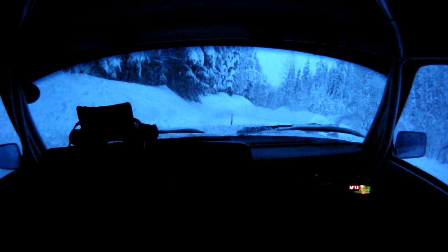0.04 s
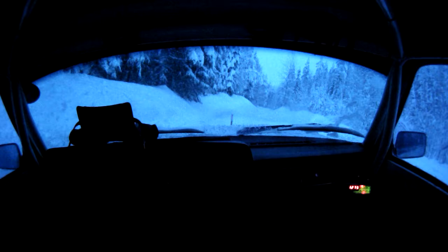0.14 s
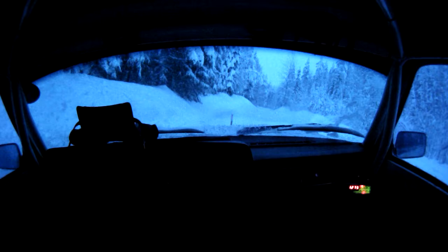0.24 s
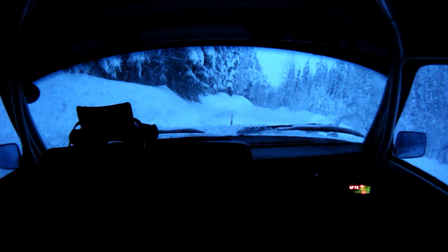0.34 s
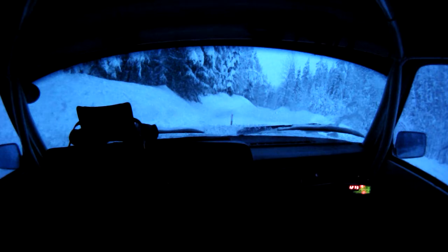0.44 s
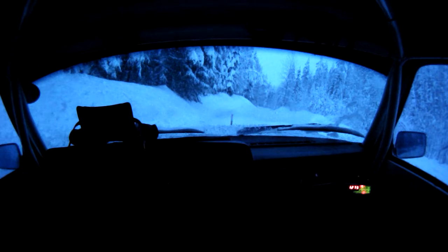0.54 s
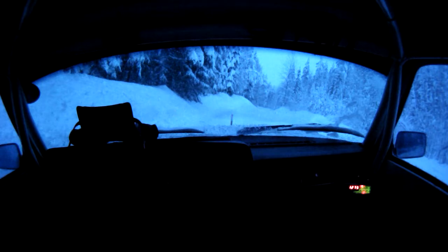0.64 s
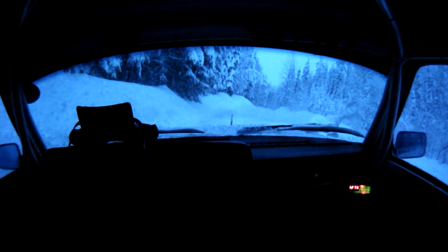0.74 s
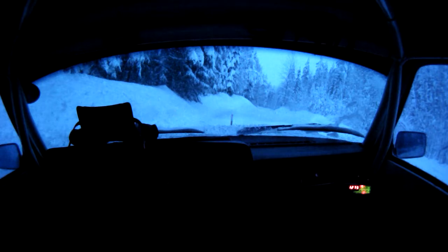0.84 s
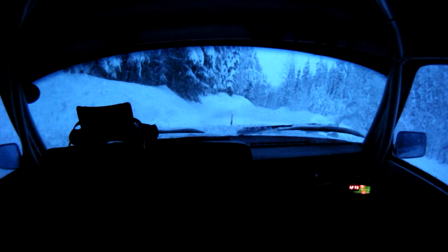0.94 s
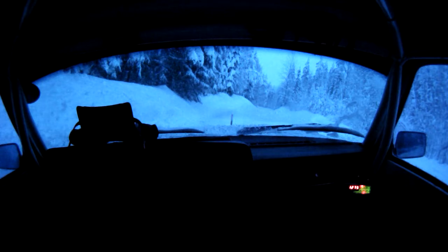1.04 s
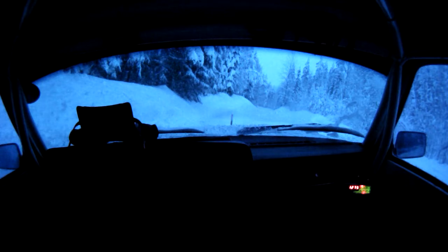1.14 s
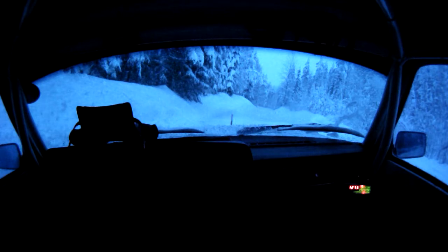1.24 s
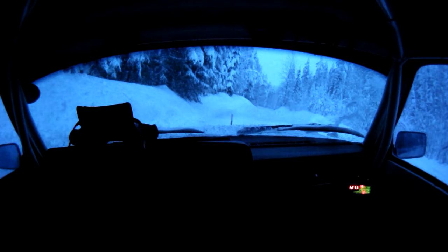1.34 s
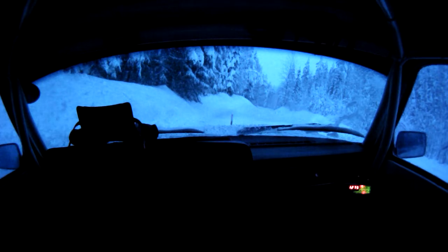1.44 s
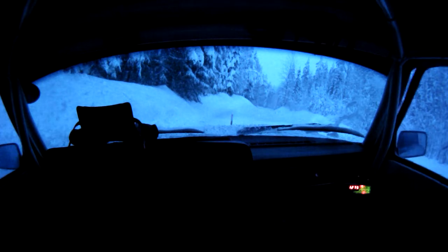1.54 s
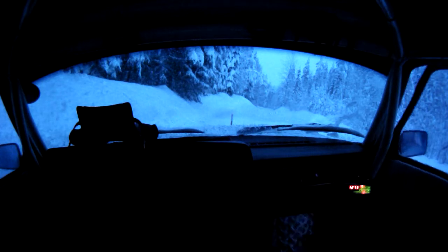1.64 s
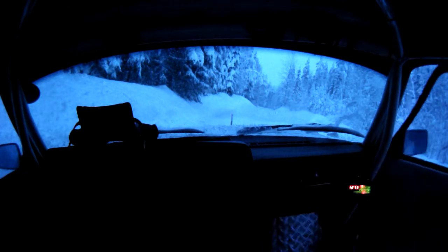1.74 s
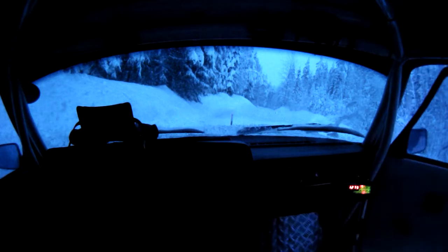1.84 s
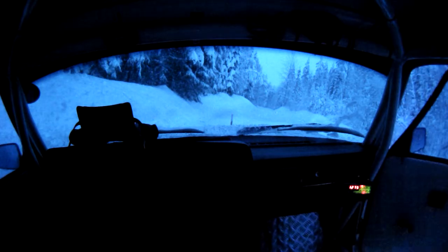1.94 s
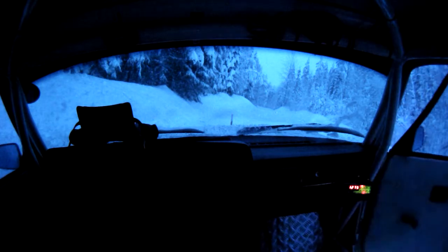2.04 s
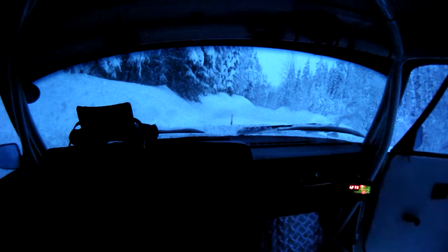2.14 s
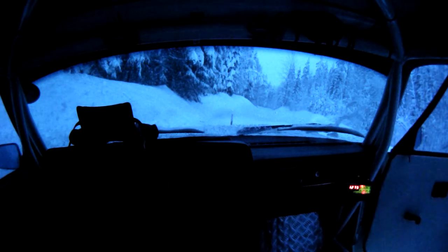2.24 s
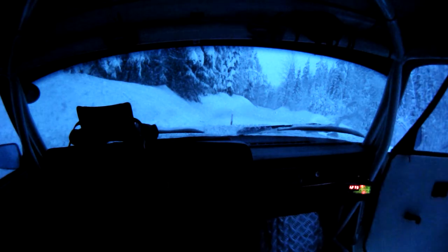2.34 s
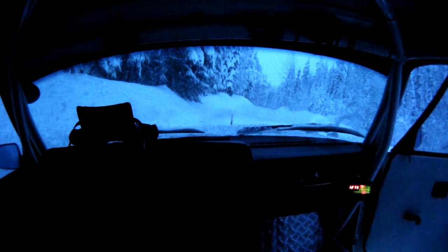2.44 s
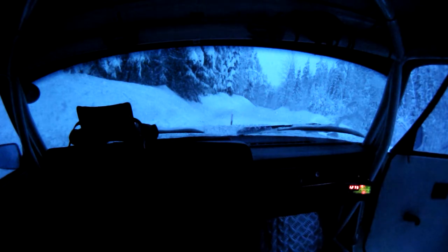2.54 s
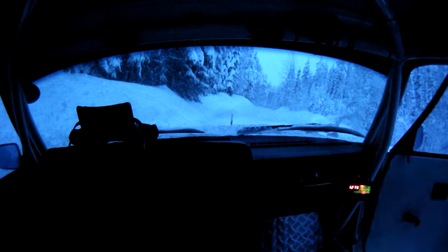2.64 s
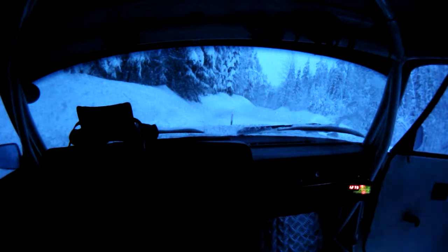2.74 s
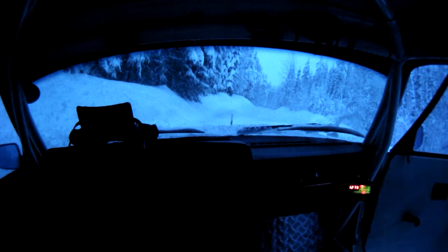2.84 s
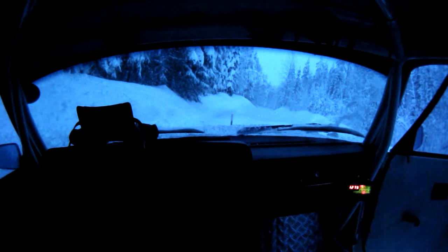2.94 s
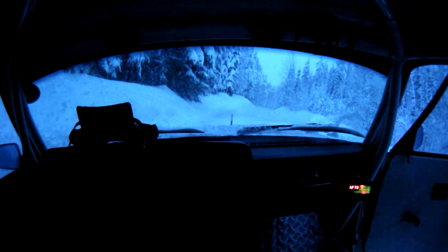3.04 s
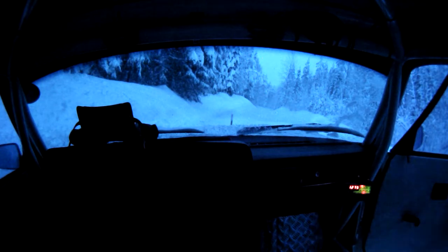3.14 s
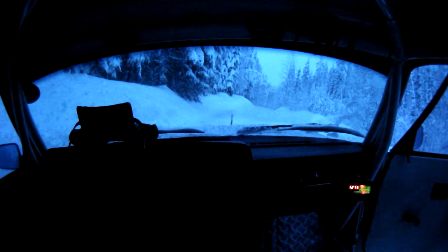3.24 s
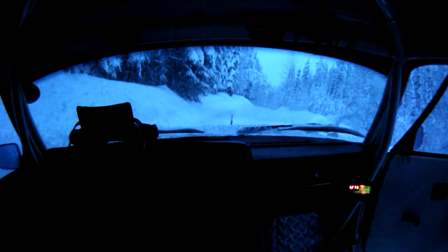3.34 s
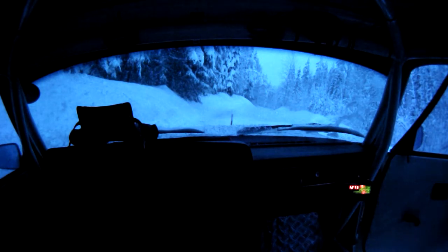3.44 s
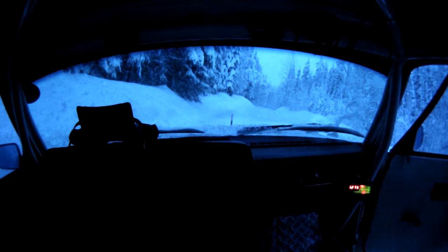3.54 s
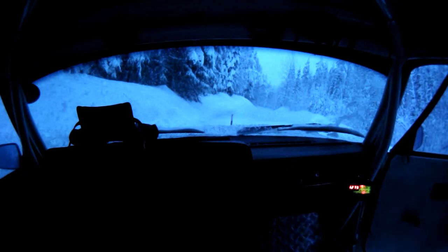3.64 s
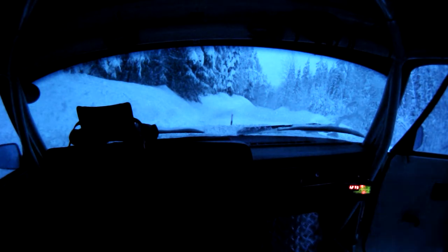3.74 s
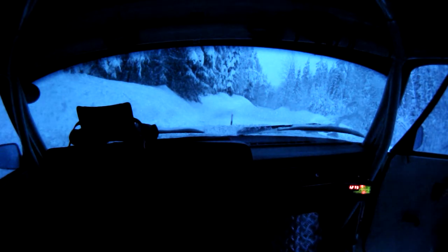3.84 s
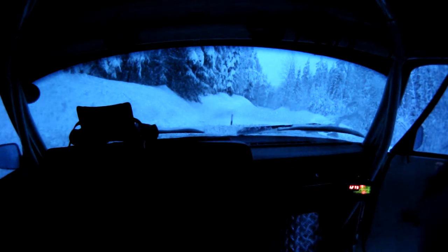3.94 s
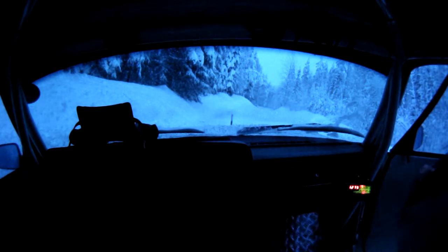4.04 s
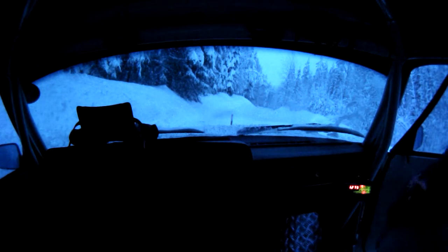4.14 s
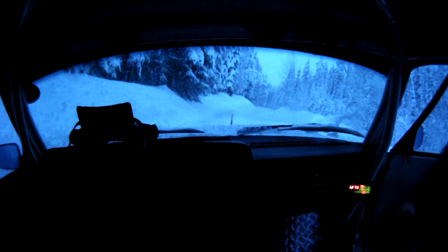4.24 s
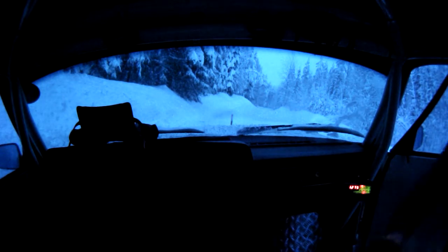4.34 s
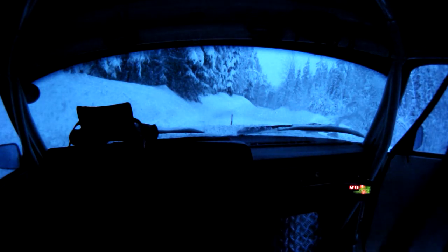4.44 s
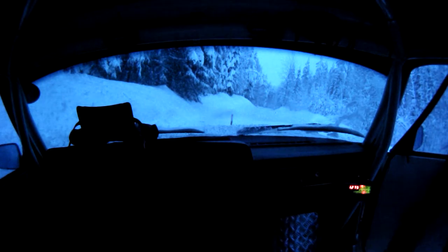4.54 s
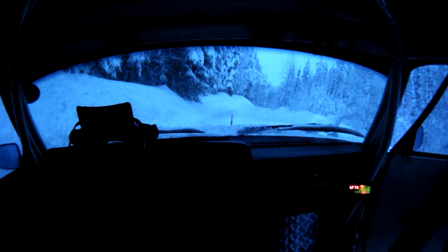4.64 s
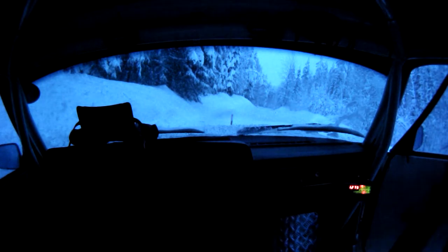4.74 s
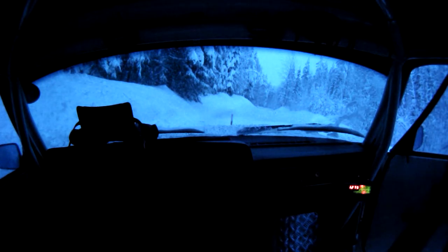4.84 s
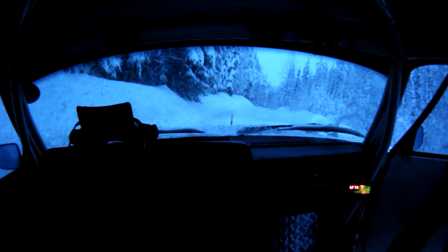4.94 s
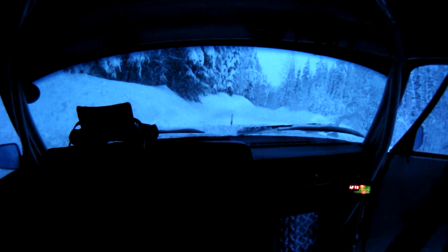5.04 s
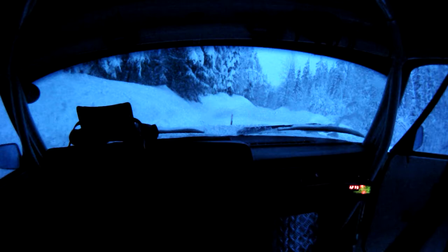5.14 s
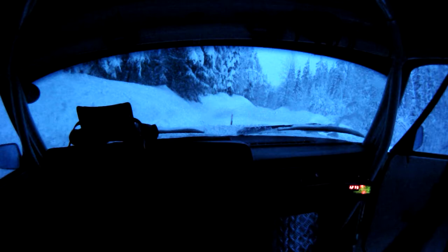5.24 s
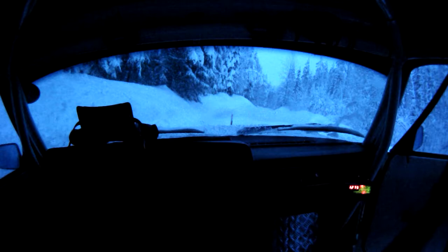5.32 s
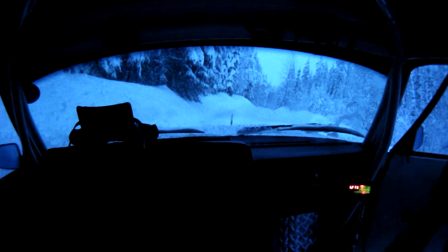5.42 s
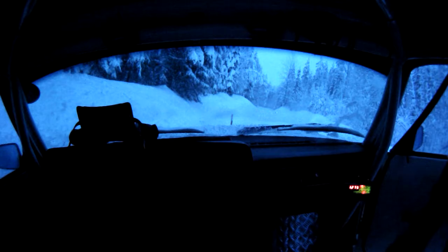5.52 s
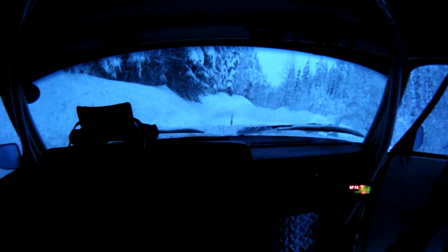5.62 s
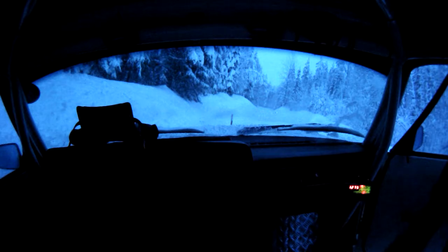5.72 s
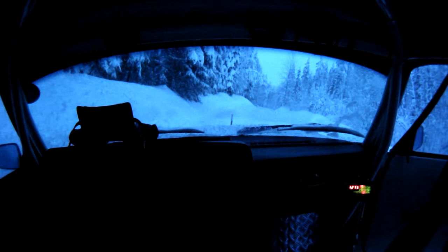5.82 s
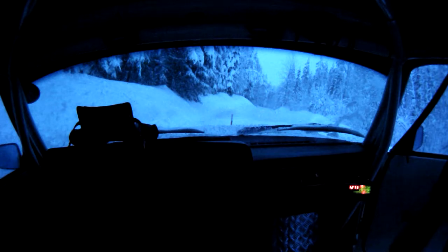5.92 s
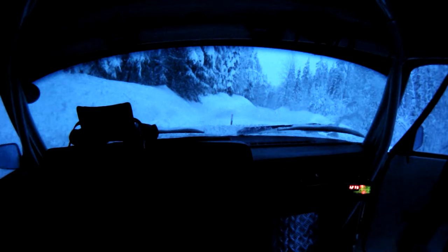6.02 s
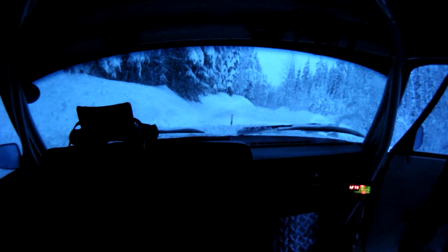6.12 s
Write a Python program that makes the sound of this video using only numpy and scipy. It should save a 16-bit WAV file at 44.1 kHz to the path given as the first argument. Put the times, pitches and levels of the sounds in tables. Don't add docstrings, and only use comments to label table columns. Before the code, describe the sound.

Small, boxy cabin of a parked car, heard from the back through a small camera microphone with faint steady hiss; the right side is duller and bassier. Almost silent at first, with a soft tap at 0.4 s. From 0.8 s the handle scrapes and rattles, with a firmer knock at 1.27. At 1.51 the latch releases: a loud metallic clunk, panel boom and deep pressure pop, then rod chatter until 1.75. A faint hinge creak precedes the door hitting its stop at 2.16. Low body thumps follow at 2.6 and, strongly, 3.2, with knocks at 3.35 and 3.56, jacket rustle and a seat creak around 3.7. Light clicks come near 4.0; a buckle drops at 4.3 and jingles brightly at 4.43. Piercing plastic snaps strike at 4.60, 4.67 and 4.72. A thin squeak sounds at 5.1-5.3, then small knocks and cloth fade by 5.8, leaving hiss and a faint tap at 6.15.

```python
import sys
import numpy as np
from scipy import signal
from scipy.fft import rfft, irfft
from scipy.io import wavfile
from scipy.ndimage import uniform_filter1d

SR = 44100
rng = np.random.default_rng(int(sys.argv[2]) if len(sys.argv) > 2 else 0)


def wav_out(sig):
    wavfile.write(sys.argv[1], SR, np.round(np.clip(np.atleast_2d(sig).T, -1, 1) * 32767).astype(np.int16))


def gain_from_db(level_db):
    decades = np.asarray(level_db, float) / 20
    return 10 ** decades


N = 272538

# f/Hz, level/dB, t60/s
BODY_MODES = [(132.96, 1.5, 0.78), (150.3, -5.5, 0.79), (73.3, -4, 0.37), (95.9, -1.5, 0.41),
              (183.5, -4.5, 0.98), (209.2, 1, 0.27), (250.7, 0, 0.44), (281.6, 1, 0.23), (322.4, 1.5, 0.26),
              (377.2, -3, 0.37), (473.6, -12, 0.47)]


def band(x, lo_hz, hi_hz, order=2):
    return signal.sosfilt(signal.butter(order, [lo_hz, min(hi_hz, .45 * SR)], "band", fs=SR, output="sos"), x)


def lowpass(x, hz, order=2):
    return signal.sosfilt(signal.butter(order, hz, fs=SR, output="sos"), x)


def unit(x):
    return x / np.sqrt(np.mean(x ** 2))


def decay(t, t60):
    return 1000. ** (-t / t60)


def ring(x, hz, t60):
    r = np.exp(-np.log(1000) / (t60 * SR))
    return signal.lfilter([1, 0, -1], [1, -2 * r * np.cos(2 * np.pi * hz / SR), r * r], x)


def coloured(points):
    hz, db = np.transpose(points)
    f = np.maximum(np.arange(N // 2 + 1) * SR / N, 1)
    gain = gain_from_db(np.interp(np.log(f), np.log(hz), db))
    return unit(irfft(rfft(rng.standard_normal(N)) * gain, N))


def walk(rate):
    hold = int(SR / rate)
    levels = np.repeat(rng.standard_normal(N // hold + 1), hold)
    return 1.26 * uniform_filter1d(levels, hold)[:N]


def curve(table):
    s, *columns = np.transpose(table)
    return [np.interp(np.arange(N) / SR, s, c, left=-120, right=-120) for c in columns]


def add(out, s, x):
    i = int(s * SR)
    out[i:i + len(x)] += x[:N - i]


def strike(modes, length, scatter_db, size, damping=1):
    t = np.arange(size) / SR
    hz, db, t60 = np.transpose(modes)
    shape = np.sin(np.pi * np.minimum(t / max(length, .0005), 1)) + (t == 0)
    pushes = rng.standard_normal((len(modes), size)) * shape
    detune = 1 + .012 * rng.standard_normal(len(modes)) * (hz < 500)
    rings = zip(pushes, hz * detune, t60 * max(damping, .05))
    rows = np.array([ring(push, f, time) for push, f, time in rings])
    gain = gain_from_db(db + scatter_db * rng.standard_normal(len(modes)))
    return rows * (gain / np.abs(rows).max(1))[:, None]


def struck(modes, hits):
    out = np.zeros(N)
    for s, db, length in hits:
        add(out, s, gain_from_db(db) * strike(modes, length, scatter_db=1.5, size=SR // 3).sum(0))
    return out


def knocks(table, tail, rise_share, tail_db, top_db, inner_s):
    out, t = np.zeros(N), np.arange(SR // 4) / SR
    for s, db, low_db, mid_db, length in table:
        t60 = tail[0] * gain_from_db(tail[1] * (db + 39.5) + tail[2] * low_db)
        length, t60 = np.clip(length, .0003, .1), np.clip(t60, .01, .4)
        noise, grain, echoes = rng.standard_normal((3, len(t)))
        after = np.maximum(t - length, 0)
        grain_db = 1.98 * uniform_filter1d(grain, size=40) * np.sqrt(40)
        rattle = noise * gain_from_db(grain_db * np.exp(-after / 0.035))
        rattle *= np.minimum(t / (rise_share * length), 1)
        body = (0.036 * echoes * np.exp(-t / inner_s) + (t == 0))[:1024]
        bright_db = top_db + 0.087 * (db + 33.5) - 0.27 * low_db
        ranges = ((428, 1330, low_db, 1.72), (1430, 3340, mid_db, 0.98),
                  (3724, 6640, 0.0044, 0.88), (7650, 26000, bright_db, 0.47))
        for lo, hi, gain_db, slow in ranges:
            body = -body
            cabin_tail = gain_from_db(tail_db) * decay(after, t60 * slow)
            fall = cabin_tail + (1 - gain_from_db(tail_db)) * np.exp(-after / .002)
            sound = band(signal.fftconvolve(rattle * fall, body)[:len(t)], lo, hi)
            add(out, s, gain_from_db(db + gain_db - 2.0) * sound / np.abs(sound).max())
    return out


def creak(table, peaks):
    slips = rng.standard_normal(N) * gain_from_db(curve(table)[0] + 0.67 * walk(99))
    out = np.zeros(N)
    for hz, width, db in peaks:
        out += gain_from_db(db) * band(slips, hz - width / 2, hz + width / 2, order=1) * np.sqrt(SR / 2 / width)
    return out


def slow_ring(table):
    out, t = np.zeros(N), np.arange(SR) / SR
    for s, db, hz, t60 in table:
        add(out, s, -gain_from_db(db) * np.sin(2 * np.pi * hz * t) * (1 - np.exp(-t / 0.013)) * decay(t, t60))
    return lowpass(out, 800)


def pressure_pop():
    # t/s, level/dB, f/Hz, t60/s
    s, db, hz, t60 = (1.512, -15, 9.5, .16)
    t, out = np.arange(SR // 2) / SR, np.zeros(N)
    phase = 2 * np.pi * hz * t + 1.1 * (1 - np.exp(-t / .006))
    add(out, s, -gain_from_db(db) * np.sin(phase) * 1000. ** (-(t / t60) ** 4))
    return out


def latch_and_stop():
    # f/Hz, level/dB, t60/s
    latch = [(610, -5, 0.19), (1145, 1.5, 0.16), (1533, 8.5, 0.13), (1790, 9.5, 0.1), (2566, 13, 0.089)]
    # t/s, level/dB, push/s
    latch_hits = [
        (1.521, -35, 0.0148),
    ]
    # f/Hz, level/dB, t60/s
    stop = [(330.4, 2.5, 0.29), (378, -5.5, 0.22), (646, -13, 0.35), (997, 1.5, .11), (1192, -6.5, 0.11),
            (1510, -1.5, 0.11), (1726, 4.5, 0.1), (2050, 3, .09), (2130, 3, 0.08), (2170, -34, 0.87),
            (2420, -3, .08)]
    # t/s, level/dB, push/s
    stop_hits = [
        (2.161, -29.5, 0.021),
    ]
    return struck(latch, latch_hits) + struck(stop, stop_hits)


def body_thuds():
    # t/s, boom/dB, bass and panels/dB over boom, share of the free ring time
    door_thuds = [(0.811, -57.5, -3, -1, 0.52), (0.876, -57.5, 3.5, 1.5, 0.67), (1.05, -58, -5, 6, 0.46),
                  (1.12, -74, 0.5, 14.5, .4), (1.176, -63, -1, -10, 0.46), (1.271, -43.5, -2.5, 2.5, 0.91),
                  (1.313, -50.5, -7.5, 3.5, 0.35), (1.394, -61, 5.5, -1, 0.4), (1.459, -57.5, -3, -6, 0.48),
                  (1.514, -27.5, -16, 10.5, 0.4), (1.55, -29, 1, 3.5, 0.78), (1.679, -45, 0, -4, 0.74),
                  (2.002, -49.5, -23.5, -30, 0.45), (2.108, -48, -20.5, -19, .52),
                  (2.159, -35.5, -21, 4, 0.82), (2.232, -46, 3, -13, .83), (2.368, -54, 0, 7, 0.31),
                  (2.606, -38, -16, -2, 0.62), (2.66, -43, -2.5, -8, 0.84), (2.719, -54.5, 11, 1, 0.92),
                  (2.921, -60.5, 7, 2, 0.63)]
    # t/s, boom/dB, bass and panels/dB over boom, share of the free ring time
    cabin_thuds = [(3.201, -30.5, -19, 1.5, 0.94), (3.222, -35, 5, 3.5, 0.57), (3.342, -43, -6, 11, 0.76),
                   (3.555, -43.5, -8, 0.5, 0.86), (3.752, -49, -30, -14, 1), (3.98, -59, 0, -4, 0.29),
                   (4.3, -45.5, 0, 3, 0.42), (4.349, -43.5, -24, -3, 0.4), (4.403, -48, 1, -44, 0.95),
                   (4.601, -49, -1, -5, 0.97), (4.695, -54, 6.5, 8, 0.21), (4.971, -60.5, 7, 3.5, 0.36),
                   (5.34, -56, 1, -3, 0.17), (5.41, -63, 10, 4.5, 0.68), (5.621, -75.5, 14, 9.5, 0.48)]
    out = np.zeros(N)
    group = np.digitize(np.array(BODY_MODES)[:, 0], [100, 160])
    for s, db, bass_db, panel_db, damping in door_thuds + cabin_thuds:
        length = min(0.02697 * gain_from_db(0.02 * panel_db), 0.11)
        share = gain_from_db(db + np.array([bass_db, 0, panel_db - 6.5]))[group]
        add(out, s, share @ strike(BODY_MODES, length, scatter_db=2, size=3 * SR // 4, damping=damping))
    return lowpass(out, 800)


def door_swings():
    # t/s, level/dB, f/Hz, t60/s
    swings = [(1.68, -36, 26, 0.37), (2.165, -36.5, 33.5, 0.35), (2.603, -22.5, 31.7, 0.35),
              (2.703, -35, 31.6, 0.59), (2.869, -44.5, 45.3, 1), (3.221, -36, 35.8, 0.56),
              (4.729, -41.5, 28.8, 0.54)]
    return slow_ring(swings)


def panel_rings():
    # t/s, level/dB, f/Hz, t60/s
    panels = [(1.32, -33, 135, 0.25), (1.2, -46, 380, .18), (1.31, -44.5, 202, .3),
              (3.35, -39.5, 410, 0.21), (1.555, -25, 128, .25), (5.2, -53, 310, 0.14),
              (2.22, -39, 136, 0.58), (4.08, -56, 183, 0.11), (2.158, -29.5, 147, .12),
              (2.8, -49, 525, .14), (1.512, -22, 340, 0.15), (2.29, -45, 325, .25), (1.665, -35, 133, .5),
              (3.8, -51.5, 100, .5), (2.36, -53, 480, .2), (0.8, -56, 170, .25), (1.79, -44.5, 570, 0.13),
              (3.225, -24.5, 129, 0.45), (3.26, -28, 86.3, 0.4), (3.205, -28.5, 253, 0.29),
              (2.6, -40.5, 140, 0.32), (2.6, -54, 520, 0.32), (3, -58, 335, 0.27), (3.7, -52, 133, 0.98),
              (.98, -56, 200, 0.27), (1.9, -54.5, 250, .3), (1.96, -66, 400, .2), (5.56, -65, 240, 0.16),
              (4, -48, 470, 0.14), (3.36, -38, 134.9, 0.75), (3.552, -26.5, 333, 0.11),
              (4.16, -55, 280, 0.17), (3.73, -54, 310, 0.16)]
    return slow_ring(panels)


def knuckle_taps():
    # f/Hz, level/dB, t60/s
    skin = [(335, 6, 0.058), (254, -1, 0.067), (493, -22, 0.08)]
    # t/s, level/dB, push/s
    taps = [(.389, -42, 0.006), (0.413, -55, 0.013), (2.505, -62, 0.0095), (6.115, -63.5, 0.014),
            (6.163, -55, 0.026)]
    out = np.zeros(N)
    for s, db, length in taps:
        add(out, s, gain_from_db(db) * band(strike(skin, length, scatter_db=2, size=SR // 3).sum(0), 200, 460))
    return lowpass(out, 800)


def hard_clicks():
    # t/s, peak/dB at 3.5-8 kHz, low-mid and mid/dB over the peak
    clicks = [(1.275, -30.5, -19, -17), (2.3675, -43, -1, -19), (2.617, -36, -6, -6), (3.03, -35, -23, -8),
              (3.14, -57, -11, 6), (3.205, -37.5, -12, -21), (3.342, -48, -10, -8),
              (3.5559, -28, -11.5, -7.5), (3.838, -38.5, -23, -11), (3.976, -28.5, -24, -14),
              (4.005, -26.5, -22, -16), (4.199, -33.5, -22, -19), (4.2766, -44, -21, -6),
              (4.302, -54, 30, -7), (4.4026, -30.5, -41, -65), (4.4324, -27.5, -26.5, 0.5),
              (4.575, -41, -15, -13), (4.5998, -11.5, -29, -13.5), (4.6476, -22, -18.5, -18.5),
              (4.6733, -6, -30, -21.5), (4.7174, -6.5, -30, -14), (4.827, -39, -19, -22),
              (4.84, -29, -52, -45), (4.98, -36.5, -48.5, -16), (5.107, -47, -22, -23),
              (5.218, -57, -27, -12), (5.369, -49, -25, -7), (5.548, -44.5, -30, -9),
              (5.4085, -30.5, -9.5, 4), (5.624, -36, -42, -7), (6.128, -49, 5, -43)]
    # t60/s, dB longer per dB of level, per dB of low-mid
    click_tail = (0.15, 0.028, 0.035)
    contacts = [(*c, 0.0012) for c in clicks]
    return knocks(contacts, click_tail, rise_share=0.14, tail_db=-13.5, top_db=-30, inner_s=0.0012)


def rattles():
    # t/s, peak/dB at 3.5-8 kHz, low-mid and mid/dB over the peak, length/s
    door_rattles = [(.18, -57.5, -26, -9, 0.0068), (.393, -60, -17, 5, 0.011), (.83, -70, 17, 9, 0.028),
                    (.88, -49, -13, 0, 0.014), (1.025, -58.5, 1, 3, 0.013), (1.05, -52.5, -2, -3, 0.013),
                    (1.22, -70.5, 17, 6, 0.032), (1.26, -39.5, -6, -1.5, 0.04),
                    (1.295, -55, 2.5, -4, 0.046), (1.514, -17.5, 2, -3.5, 0.024),
                    (1.555, -39.5, -3, 0, 0.033), (1.585, -30.5, 1, -4.5, 0.01), (1.63, -67, 18, -12, 0.11),
                    (1.785, -46, -8, -9, 0.012), (2.11, -48.5, 5, -2, 0.025),
                    (2.134, -34, -5, -8.5, 0.0021), (2.157, -16.5, -10, -2, 0.026),
                    (2.21, -31.5, 0.5, -15, 0.0061), (2.375, -48.5, -2, -2, 0.0084),
                    (2.62, -40.5, 2, -4, 0.039), (2.68, -45.5, 0.5, -3, 0.059), (2.91, -55, 5.5, 0, 0.038)]
    # t/s, peak/dB at 3.5-8 kHz, low-mid and mid/dB over the peak, length/s
    cabin_rattles = [(3.026, -31.5, -28, -7, 0.025), (3.199, -31, -4.5, -12.5, 0.045),
                     (3.334, -30.5, -11, -10, 0.054), (3.557, -28, -8.5, -16, 0.0183),
                     (3.844, -40.5, -15, -25, 0.053), (3.88, -37.5, -20, -5, 0.016),
                     (4.03, -45.5, -8, -12, 0.0085), (4.128, -47.5, -6.5, 1, 0.0053),
                     (4.134, -34, -17, -15, 0.0018), (4.305, -37.5, 10, -6, 0.0059),
                     (4.406, -34, -24, -42, 0.013), (4.433, -25.5, -12, -13, 0.023),
                     (4.535, -35, -20.5, -58, 0.013), (4.983, -38, -29.5, -14, 0.015),
                     (5.29, -45, -30, -12, 0.046), (5.426, -35.5, -13, -8, 0.0049),
                     (5.497, -38.5, -17.5, -16, 0.033), (5.69, -73, -7, 18, 0.012)]
    # t60/s, dB longer per dB of level, per dB of low-mid
    rattle_tail = (0.11, 0.019, 0.12)
    return knocks(door_rattles + cabin_rattles, rattle_tail, rise_share=0.29, tail_db=0, top_db=-32.5, inner_s=0.007)


def buckle_and_spring():
    # f/Hz, level/dB, t60/s
    dropped = [(704, -1.5, 0.24), (750, -0.5, 0.28), (800, -4, .2), (1000, -7, 0.11), (1218, -5, .17),
               (1310, -11, 0.15), (1604, -11.5, .14), (1760, 2, 0.091), (1810, -9.5, .12),
               (2234, -21, 0.093), (2450, -10.5, .1), (3920, -14, .16), (3950, -17, 0.23)]
    # t/s, level/dB, push/s
    drop_hits = [
        (4.299, -31.5, 0.0094),
    ]
    # f/Hz, level/dB, t60/s
    buckle = [(1209, -15.5, .13), (2474, -12.5, 0.081), (3833, -1.5, 0.14), (3940, -15, .3),
              (4063, -7.5, .2), (4484, -9.5, .15), (4780, -7, .08), (5039, -13, .15), (5460, -2, 0.056),
              (5771, -7.5, .09), (6158, -8.5, 0.13), (7181, -10, 0.1), (7860, -26, .11), (10500, -26, .16)]
    # t/s, level/dB, push/s
    buckle_hits = [(4.403, -37, 0.0064), (4.415, -42.5, .012), (4.431, -20.5, 0.0086),
                   (4.441, -29.5, 0.011), (4.449, -27, 0.0031), (4.457, -32, 0.012), (4.478, -41, 0.01),
                   (4.506, -52.5, 0.0069)]
    # f/Hz, level/dB, t60/s
    spring = [(3675, 0, 0.22)]
    # t/s, level/dB, push/s
    spring_hits = [(4.31, -47, 0.023), (4.355, -51, 0.029), (4.403, -49, 0.023), (4.444, -32, 0.02),
                   (4.495, -39.5, 0.018), (4.522, -33, 0.024), (4.555, -39, 0.012), (4.61, -47.5, 0.03),
                   (4.73, -52, 0.05)]
    return struck(dropped, drop_hits) + struck(buckle, buckle_hits) + struck(spring, spring_hits)


def plastic_catches():
    # f/Hz, level/dB, t60/s
    catch = [(3160, -6.5, .08), (3420, 0.5, 0.026), (3850, 9, .03), (5389, -3.5, .11), (5766, -1, .055),
             (6110, -8, .07), (7084, -2.5, 0.037), (8800, -10, .02)]
    # t/s, level/dB, push/s
    catch_hits = [
        (4.599, -27, .0017),
    ]
    # f/Hz, level/dB, t60/s
    snap = [(1543, -16.5, .09), (2420, -10, .07), (3380, 0.5, .029), (4340, -8, .09), (4900, 2, .055),
            (5100, 0, .06), (5470, -5, .08), (6550, -2.5, .045), (10520, -16, .07), (12190, -21, .055),
            (13560, -17, .036)]
    # t/s, level/dB, push/s
    snap_hits = [
        (4.674, -26, .003),
        (4.685, -41, .0008),
    ]
    # f/Hz, level/dB, t60/s
    clip = [(1710, -19, .1), (2318, -13, .06), (2715, -7, .069), (3296, -10, .06), (4510, -8.5, .13),
            (5060, -3, .055), (5480, 1, .048), (6056, 0, 0.079), (6680, -8, 0.056), (6950, 8, .015)]
    # t/s, level/dB, push/s
    clip_hits = [
        (4.719, -21, 0.0016),
        (4.722, -25, 0.0026),
        (4.731, -34, 0.0027),
    ]
    return struck(catch, catch_hits) + struck(snap, snap_hits) + struck(clip, clip_hits)


def trim_parts():
    # f/Hz, level/dB, t60/s
    trim = [(530, -0.5, 0.14), (1050, -0.5, 0.077), (1525, 0, 0.072), (2470, -16, 0.07), (2626, -1, 0.1)]
    # t/s, level/dB, push/s
    trim_hits = [
        (3.024, -47, 0.025),
        (3.346, -47.5, 0.035),
    ]
    # f/Hz, level/dB, t60/s
    tray = [(918, -2.5, 0.09), (1950, 1, 0.03), (2080, -9, .1), (1500, -2, .03)]
    # t/s, level/dB, push/s
    tray_hits = [
        (5.409, -41, 0.0137),
    ]
    # f/Hz, level/dB, t60/s
    plastic = [(2060, 4, 0.045), (3370, 2.5, 0.055), (5160, -5, .04), (6850, 2.5, 0.031)]
    # t/s, level/dB, push/s
    plastic_hits = [
        (4.98, -53.5, 0.019),
        (4.036, -59, .012),
        (5.624, -55.5, 0.0066),
    ]
    # f/Hz, level/dB, t60/s
    stud = [(7710, 6.5, 0.041), (8800, -5, .035), (5700, -2, .03), (10700, -14, .05)]
    # t/s, level/dB, push/s
    stud_hits = [
        (5.435, -47.5, 0.0122),
        (5.508, -54, 0.011),
        (4.045, -64, 0.0196),
    ]
    knocked = struck(trim, trim_hits) + struck(tray, tray_hits)
    return knocked + struck(plastic, plastic_hits) + struck(stud, stud_hits)


def movement():
    # t/s, arm movement/dB, weight shifting on the body/dB
    effort = [(.75, -145, -99), (.9, -87, -58.5), (1.3, -96, -90), (1.59, -83, -43), (1.85, -78, -58),
              (2.24, -79, -55), (2.6, -65, -62.5), (2.98, -68, -60.5), (3.38, -65.5, -62.5),
              (3.7, -62.5, -63), (4.0, -71, -64.5), (4.3, -72, -65), (4.52, -62.5, -53),
              (4.75, -62.5, -64.5), (5.1, -62.5, -70), (5.42, -58.5, -63.5), (5.69, -68.5, -79.5),
              (5.85, -87, -83)]
    # f/Hz, level/dB per Hz
    jacket = [(880, -42), (1500, 5), (1850, -11), (2480, 3.5), (3610, 5.5), (5500, 11.5), (12300, -13.5),
              (14000, -21.5)]
    arm_db, weight_db = curve(effort)
    crackle = gain_from_db(1.9 * rng.exponential(size=N))
    cloth = unit(band(coloured(jacket) * crackle, 1500, 12000)) * gain_from_db(arm_db + 1.5 + 2 * walk(60))
    rub_db = -7 + 0.23 * weight_db + 0.77 * arm_db
    rub = unit(band(rng.standard_normal(N), 650, 1900)) * gain_from_db(rub_db + 3.6 * walk(42))
    push = rng.standard_normal(N) * gain_from_db(5 * walk(17))
    shaken = sum(gain_from_db(db) * unit(ring(push, hz, 0.62 * t60)) for hz, db, t60 in BODY_MODES)
    shake = unit(shaken) * gain_from_db(weight_db - 0.5)
    rock = unit(band(push, 22, 41)) * gain_from_db(-5 - 58.0 + 0.24 * (weight_db + 58))
    return cloth + rub + shake + rock


def door_creaks():
    # t/s, level/dB
    handle = [(.826, -74), (.835, -62.5), (.87, -71), (.888, -70), (.945, -70.5), (.96, -94), (1.024, -90),
              (1.034, -61), (1.09, -80)]
    # f/Hz, width/Hz, level/dB
    handle_peaks = [(1700, 180, -2), (2140, 770, -13)]
    # t/s, level/dB
    rod = [(1.58, -70), (1.6, -51), (1.65, -63.5), (1.7, -70.5), (1.738, -64), (1.75, -89)]
    # f/Hz, width/Hz, level/dB
    rod_peaks = [(1551, 160, -0.5), (1830, 200, -9), (1180, 150, -4.5)]
    # t/s, level/dB
    hinge = [(1.8, -94), (1.85, -90), (1.93, -89), (1.97, -77.5), (2.05, -75), (2.1, -82.5)]
    # f/Hz, width/Hz, level/dB
    hinge_peaks = [(990, 110, 1), (1700, 70, 2), (2270, 130, -3), (2620, 90, -4), (600, 500, -1),
                   (1400, 900, 0)]
    return creak(handle, handle_peaks) + creak(rod, rod_peaks) + creak(hinge, hinge_peaks)


def cabin_creaks():
    # t/s, level/dB
    seat = [(3.6, -80), (3.63, -67), (3.66, -78), (3.678, -58), (3.7, -72), (3.74, -74), (3.76, -62),
            (3.785, -75)]
    # f/Hz, width/Hz, level/dB
    seat_peaks = [(960, 56, 0), (1150, 90, -5)]
    # t/s, level/dB
    squeak = [(5.09, -83), (5.115, -67), (5.15, -64), (5.176, -56), (5.2, -61), (5.232, -64), (5.264, -61),
              (5.3, -68), (5.32, -80)]
    # f/Hz, width/Hz, level/dB
    squeak_peaks = [(2085, 60, 0)]
    # t/s, level/dB
    overtones = [(5.1, -80), (5.12, -66), (5.16, -62), (5.175, -59), (5.2, -65), (5.22, -80)]
    # f/Hz, width/Hz, level/dB
    overtone_peaks = [(4080, 120, -5), (5200, 100, -4), (6950, 90, 0)]
    return creak(seat, seat_peaks) + creak(squeak, squeak_peaks) + creak(overtones, overtone_peaks)


def scene():
    air = pressure_pop() + latch_and_stop()
    air += body_thuds() + door_swings() + panel_rings() + knuckle_taps()
    air += hard_clicks() + rattles()
    air += buckle_and_spring() + plastic_catches() + trim_parts()
    air += movement() + door_creaks() + cabin_creaks()
    return np.array([air, air])


def microphones(air):
    left = lowpass(air, 13500, order=6)
    bass = lowpass(lowpass(left, 190, order=1), 580)
    top = signal.sosfiltfilt(signal.butter(1, 11000, "high", fs=SR, output="sos"), left)
    right = .5 * left + 1.1 * bass + .1 * top
    return np.array([left, right])


def quiet_bumps():
    bump_times = [0.273, 0.318, 0.48, 0.528, 0.6, 0.645, 0.714, 5.797, 5.962, 6.004]
    half_width_s = .0016
    out, u = np.zeros(N), np.arange(-SR // 100, SR // 100) / SR / half_width_s
    for s in bump_times:
        add(out, s - 1 / 100, gain_from_db(-66) * (1 - 2 * u ** 2) * np.exp(-u ** 2))
    return out


def converter_noise():
    # f/Hz, level/dB per Hz
    hiss_points = [(240, -42), (500, -31), (660, -8.5), (900, -2), (2220, -5), (2950, -5), (11900, -7),
                   (15500, -11.5)]
    hiss_db = [-70.5, -68.5]
    drift_db = [-79.5, -68.5]
    offset = [.0158, .0394]
    hiss = np.array([coloured(hiss_points) * gain_from_db(db) for db in hiss_db])
    drift = gain_from_db(drift_db)[:, None] * unit(band(rng.standard_normal(N), 13, 100, order=3))
    return hiss + drift + quiet_bumps() + np.array(offset)[:, None]


def band_limit(x):
    return signal.sosfilt(signal.butter(12, 15100, fs=SR, output="sos"), x)


def record(dry):
    return band_limit(microphones(dry[0]) + converter_noise())


dry = scene()
out = record(dry)
wav_out(out)
```